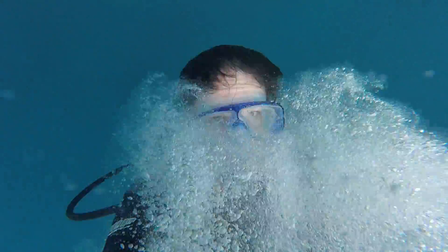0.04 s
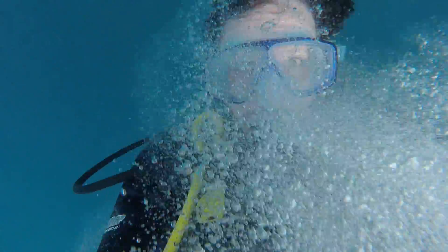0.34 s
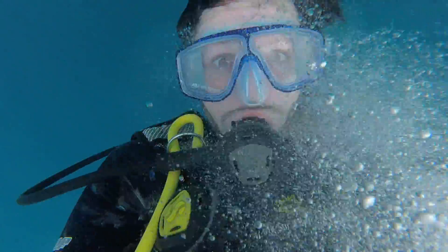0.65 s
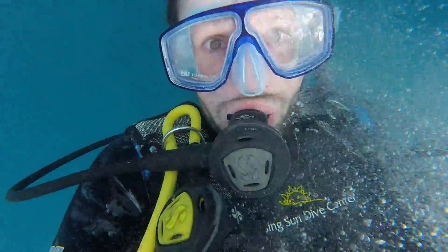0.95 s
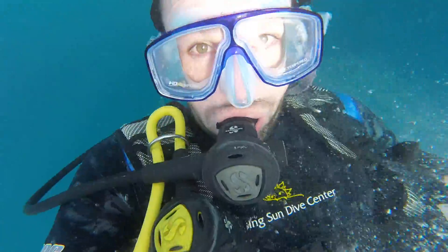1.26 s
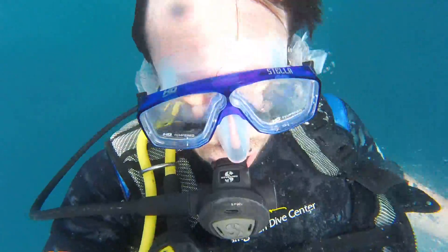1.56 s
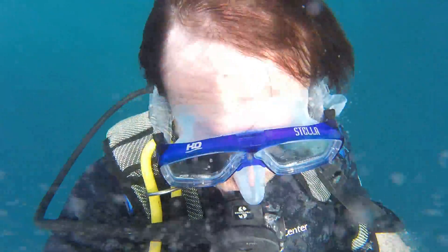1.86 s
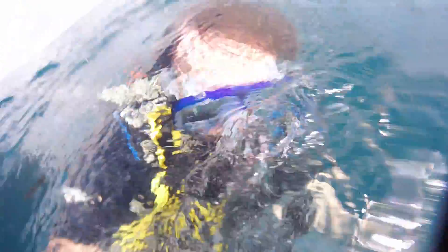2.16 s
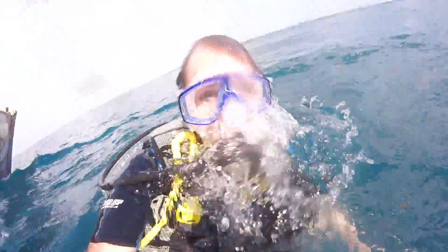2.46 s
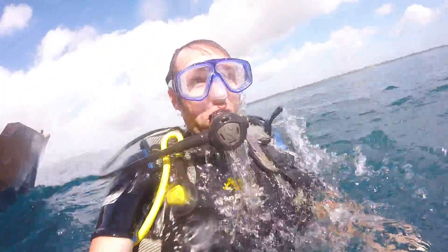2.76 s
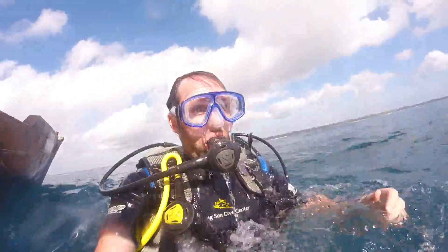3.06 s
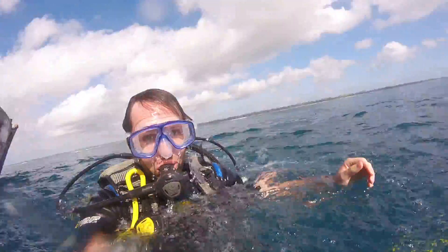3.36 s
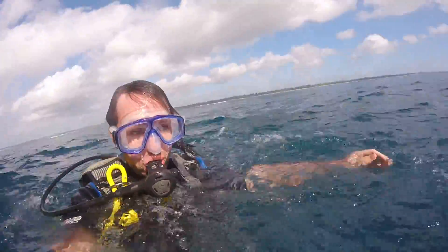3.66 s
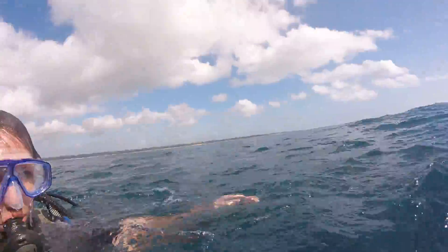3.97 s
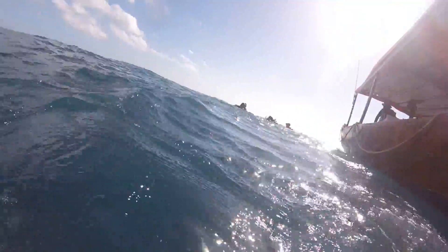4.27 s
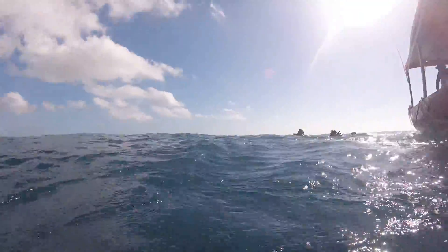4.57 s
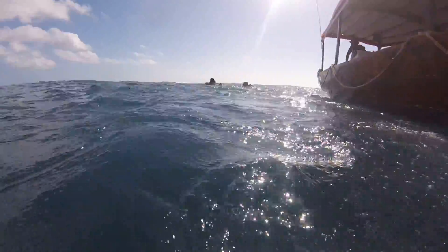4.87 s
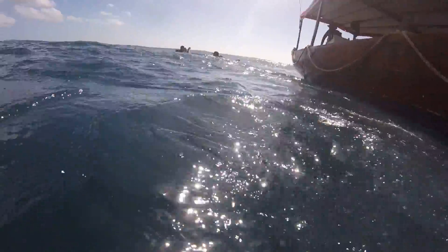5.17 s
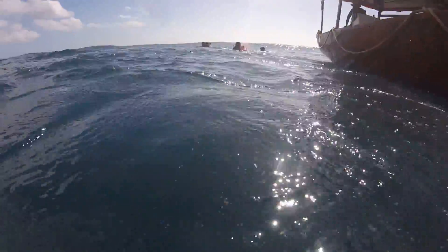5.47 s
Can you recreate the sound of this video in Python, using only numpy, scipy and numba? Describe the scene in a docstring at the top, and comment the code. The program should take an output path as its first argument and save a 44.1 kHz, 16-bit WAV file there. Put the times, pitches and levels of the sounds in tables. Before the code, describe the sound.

Muffled bubbles gurgle underwater around a diver, then foam fizzes at the surface and waves slosh and slap over the microphone.

```python
"""A diver rises through a cloud of bubbles, holding a camera in a waterproof case.
Under water big bubbles gurgle and tiny ones crackle and pop, over a deep sway of pressure.
Near 2 s the camera breaks the surface: the gurgle dies, drops tick on the case and foam fizzes.
From about 3.8 s waves wash over the case: gushes, slaps, plops, dull thumps and the hollow ring
of the air inside."""
import sys
import numpy as np
from scipy import signal
from scipy.fft import rfft, irfft, next_fast_len
from scipy.io import wavfile
from scipy.ndimage import uniform_filter1d
from numba import njit

SR = 44100
rng = np.random.default_rng(int(sys.argv[2]) if len(sys.argv) > 2 else 0)


def wav_out(sig):
    """Save sig, one row per channel (or a flat mono array), as 16-bit PCM at SR to the path in sys.argv[1]."""
    wavfile.write(sys.argv[1], SR, np.round(np.clip(np.atleast_2d(sig).T, -1, 1) * 32767).astype(np.int16))


N = 252296
TIME = np.arange(N) / SR
SURFACE_S = 1.953


def amp(db):
    """Decibels to gain."""
    return 10 ** (np.asarray(db) / 20)


def unit(x):
    """Scale to rms 1."""
    return x / np.sqrt(np.mean(x ** 2) + 1e-20)


def noise():
    """White noise."""
    return rng.standard_normal(N)


def swell(start_s, end_s, rise_db_per_s, fall_db_per_s):
    """Gain that rises until start_s, holds until end_s and falls away."""
    early_s, late_s = np.maximum(start_s - TIME, 0), np.maximum(TIME - end_s, 0)
    return amp(-rise_db_per_s * early_s - fall_db_per_s * late_s)


def hump(sound, crest_s, half_length_s, db):
    """Swell a sound smoothly to db at crest_s and let it ebb."""
    shape = np.cos(np.pi / 2 * np.clip((TIME - crest_s) / half_length_s, -1, 1)) ** 2
    part = shape * sound
    return amp(db) * part * np.sqrt(np.sum(shape ** 2) / (np.sum(part ** 2) + 1e-20))


def flutter(rate_hz, depth_db):
    """Randomly wandering gain."""
    steps = rng.standard_normal(1024)
    return amp(depth_db * np.interp(TIME * rate_hz, np.arange(len(steps)), steps))


def colour(x, points):
    """Shape a spectrum by (Hz, dB) points; rms 1."""
    hz, db = np.transpose(points)
    size = next_fast_len(N)
    log_hz = np.log(np.maximum(np.fft.rfftfreq(size, 1 / SR), 1))
    gain = amp(np.interp(log_hz, np.log(hz), db))
    return unit(irfft(rfft(x, size) * gain, size)[:N])


def resonate(x, hz, width_hz):
    """One resonance, gain 1 at its centre."""
    return signal.lfilter(*signal.iirpeak(hz, hz / width_hz, fs=SR), x)


def band(x, hz, width_hz):
    """A steep resonance; rms 1."""
    return unit(resonate(resonate(x, hz, width_hz), hz, width_hz))


@njit
def rings(start_s, hz, gain, t60_s, glide, rise_cycles):
    """Damped sines that build up, then die while the pitch climbs by the share `glide` per t60."""
    out = np.zeros(N)
    for k in range(len(start_s)):
        first, length = int(start_s[k] * SR), t60_s[k] * SR
        fade = np.exp(-np.log(1000) / length)
        build = np.exp(-hz[k] / (rise_cycles * SR))
        phase, strength, lag = 0., gain[k], 1.
        for i in range(max(0, min(int(length * 1.3), N - first))):
            out[first + i] += strength * (1 - lag) ** 2 * np.sin(phase)
            phase += 2 * np.pi * hz[k] / SR * (1 + glide * i / length)
            strength, lag = strength * fade, lag * build
    return out


def play(rows, glide, rise_cycles):
    """Ring each row of (start s, Hz, dB, t60 s)."""
    start_s, hz, db, t60_s = np.array(rows, float).T.copy()
    return rings(start_s, hz, amp(db), t60_s + 1e-4, float(glide), rise_cycles)


def with_ring_time(rows, t60_at_1khz_s, exponent):
    """Make rows of (start s, Hz, dB, t60 s): bigger, lower bubbles ring longer."""
    return [(s, hz, db, t60_at_1khz_s * (1000 / hz) ** exponent) for s, hz, db, *_ in rows]


def swarm(start_s, end_s, low_hz, high_hz, cycles, spread_db, glide, count):
    """Bubbles at random times and pitches, a few stronger than the rest."""
    when, pitch, strength, life = rng.random((count, 4)).T
    hz = low_hz * (high_hz / low_hz) ** pitch
    gain = hz / high_hz * amp(-spread_db * np.log(.01 + strength))
    t60_s = cycles * (.5 + life) / hz
    return rings(start_s + (end_s - start_s) * when, hz, gain, t60_s, glide, 0.96)


def whine(hz=9630, db=-76.5):
    """The camera's electronics give a faint high tone."""
    fade_up = np.minimum(0.34 + TIME / 2.2, 1)
    return amp(db) * np.sqrt(2) * np.sin(2 * np.pi * hz * TIME) * fade_up


# Distant sea through the case. Each row: frequency in Hz, gain in dB.
SEA_SPECTRUM = [(100, 6), (500, 1.5), (1300, -7.5), (2200, -13.5), (3000, -10), (5000, -18.5), (8000, -26),
                (12000, -28.5), (15000, -35.5)]

def sea():
    """The open sea hisses faintly as the camera nears the surface."""
    return amp(-58) * swell(1, 1, rise_db_per_s=25.5, fall_db_per_s=0) * colour(noise(), SEA_SPECTRUM)


# Strength of the pressure swings. Each row: time in seconds, relative level in dB.
SWAY_LEVELS = [(0.0, -22), (1.9, -25.5), (2.55, -29), (3.8, -33.5), (4.1, -25), (4.78, -26), (4.92, -29.5),
               (5.6, -24), (5.72, -34)]
# Their spectrum. Each row: frequency in Hz, gain in dB.
SWAY_SPECTRUM = [(5, -4.5), (11, 0), (22, -5.5), (35, -17), (60, -27.5), (100, -37), (200, -44), (400, -64),
                 (800, -100)]

def sway():
    """Water pressure heaves on the microphone as the camera moves."""
    heave = colour(noise(), SWAY_SPECTRUM)
    levelled = heave / np.sqrt(uniform_filter1d(heave ** 2, size=12000))
    return amp(6.5) * levelled * amp(np.interp(TIME, *np.transpose(SWAY_LEVELS)))


# Tiny bubbles under water. Each row: frequency in Hz, gain in dB.
CRACKLE_SPECTRUM = [(710, -23.5), (1200, -1), (1900, -7.5), (2590, -1), (3120, -8), (3770, -5.5),
                    (5300, -17), (7440, -19.5), (9670, -40.5), (16400, -120)]

def crackle():
    """Tiny bubbles burst against the case over a soft hiss; one puff of the finest fizzes past."""
    ticks = swarm(0, TIME[-1], 1000, 9000, cycles=22, spread_db=3.1, glide=.06, count=3000)
    ticks = colour(ticks * flutter(rate_hz=35, depth_db=4), CRACKLE_SPECTRUM)
    ticks *= swell(SURFACE_S, SURFACE_S, rise_db_per_s=8, fall_db_per_s=36)
    hiss = colour(noise(), CRACKLE_SPECTRUM)
    puff = hump(band(hiss, 4000, width_hz=3300), crest_s=0.904, half_length_s=0.088, db=-65.5)
    hiss *= swell(1, 1, rise_db_per_s=3, fall_db_per_s=12)
    return amp(-57) * ticks + amp(-65.5) * hiss + puff


# Foam through the case wall. Each row: frequency in Hz, gain in dB.
FOAM_SPECTRUM = [(180, -17.5), (300, -5.5), (390, -10), (487, -8.5), (822, -8.5), (1280, -5), (1590, -12),
                 (2160, -21), (2940, -5.5), (3600, -21.5), (5610, -24), (9670, -34.5), (16400, -120)]

def foam(flow):
    """Foam fizzes up after the surfacing, then drains; each wave stirs up a little more."""
    fizz = unit(swarm(0, TIME[-1], 303, 15250, cycles=45, spread_db=1.3, glide=0.29, count=13000))
    fizz *= flutter(rate_hz=30, depth_db=2.5)
    draining = swell(SURFACE_S + 0.69, SURFACE_S + 0.68, rise_db_per_s=16, fall_db_per_s=9.5)
    return colour(fizz + noise(), FOAM_SPECTRUM) * (amp(-49) * draining + amp(-13.5) * flow)


# Fine droplets on the case. Each row: start in seconds, level in dB.
DROPLETS = [(2.145, -36.5), (2.2175, -61), (2.2783, -38), (2.322, -54)]
# Their spectrum. Each row: frequency in Hz, gain in dB.
DROPLET_SPECTRUM = [(3000, -27), (7500, -2), (9600, -2), (11000, -16), (16000, -12)]

def droplets(decay_s=0.00046):
    """Fine droplets tick on the case: a few sharp ones just after the surfacing, faint ones around it."""
    envelope = sum(amp(db) * (TIME >= s) * np.exp(-np.abs(TIME - s) / decay_s) for s, db in DROPLETS)
    faint = swarm(.8, 2.8, 7000, 15000, cycles=12, spread_db=2, glide=.1, count=60)
    return envelope * colour(noise(), DROPLET_SPECTRUM) + amp(-83.5) * colour(faint, DROPLET_SPECTRUM)


# Waves over the case. Each row: start in seconds, hold in seconds, level in dB.
WAVES = [(3.785, 0.21, -49.5), (3.97, 0.083, -42), (4.152, 0.079, -47.5), (4.315, 0.095, -41),
         (4.468, 0.078, -38), (4.59, 0.26, -43), (5.124, 0.21, -61)]

def water_flow():
    """Strength of the water sheet on the case: each wave rises, holds and runs off."""
    waves = [amp(db) * swell(start_s, start_s + hold_s, rise_db_per_s=471, fall_db_per_s=296)
             for start_s, hold_s, db in WAVES]
    return np.max(waves, axis=0)


# Bubbly water on the case. Each row: frequency in Hz, gain in dB.
WASH_SPECTRUM = [(240, -53.5), (400, -44), (570, -12), (784, -7), (908, 1), (1100, -7), (1500, -2),
                 (1670, -9.5), (1870, -5.5), (2300, -12), (3120, -7), (3800, -26), (4140, -15), (4850, -61),
                 (16400, -120)]

def wash(flow):
    """A sheet of water runs over the case, dense with small bubbles over a slosh of larger ones."""
    start_s, end_s = WAVES[0][0] - .2, TIME[-1]
    bubbles = swarm(start_s, end_s, 400, 13000, cycles=20, spread_db=3.0, glide=.15, count=6000)
    sheet = colour(bubbles, WASH_SPECTRUM) * np.sqrt((end_s - start_s) / end_s)  # rms 1 while active
    slosh = band(noise(), 587, width_hz=910)
    return (sheet + amp(-12) * slosh) * flow * flutter(rate_hz=80, depth_db=3)


# Spurts of water. Each row: start in seconds, length in seconds, bubble level in dB,
# bubble pitch in Hz, spray level in dB.
GUSHES = [(4.291, 0.0515, -26.5, 2040, -45), (4.306, 0.014, -33.5, 1950, -50),
          (4.615, 0.024, -33, 1800, -46), (4.659, 0.025, -29.5, 1530, -56), (4.697, 0.0093, -32, 3460, -41),
          (4.755, 0.1, -30.5, 1660, -42), (4.962, 0.021, -45.5, 1160, -51),
          (5.005, 0.036, -46, 2860, -46.5), (5.171, 0.021, -39, 2950, -38.5),
          (5.579, 0.022, -50.5, 2930, -40.5)]
# Their spray. Each row: frequency in Hz, gain in dB.
SPRAY_SPECTRUM = [(300, 16.5), (1000, -18), (3000, 4.5), (5000, -6), (6000, -12.5), (7000, -11),
                  (8500, -22), (16000, -69.5)]

def gushes(ramp_s=0.004):
    """Water squeezes past the case in spurts: bubbles crowd around one pitch, spray hisses."""
    bubbles = swarm(0, TIME[-1], 559, 11900, cycles=13, spread_db=0.8, glide=0.12, count=22000)
    froth = colour(bubbles, WASH_SPECTRUM)
    spray = colour(noise(), SPRAY_SPECTRUM)
    out = np.zeros(N)
    for start_s, length_s, db, hz, spray_db in GUSHES:
        inside_s = np.minimum(TIME - start_s, start_s + length_s - TIME)
        gate = np.clip(inside_s / ramp_s + .5, 0, 1)
        spurt = gate * (resonate(froth, hz, width_hz=hz * 0.17) + amp(-9.5) * froth)
        spurt *= np.sqrt(length_s * SR / np.sum(spurt ** 2))
        out += amp(db) * spurt + amp(spray_db) * gate * spray
    return out


# The diver's bubbles. Each row: frequency in Hz, gain in dB.
CLOUD_SPECTRUM = [(35, -21), (60, -13), (103, -4), (172, -1.5), (296, -2), (354, -2.5), (556, -2),
                  (624, -1.5), (760, -15.5), (930, -25.5), (1160, -43), (1800, -59), (2860, -72)]

def bubble_cloud(split_hz=280, growth_db_per_s=0.62):
    """The diver's bubbles gurgle; the big ones rise away first, the rest die out at the surface."""
    bubbles = swarm(0, TIME[-1], 60.66, 1217.3, cycles=45.5, spread_db=2.0, glide=0.18, count=7000)
    gurgle = colour(bubbles, CLOUD_SPECTRUM)
    lows = signal.sosfiltfilt(signal.butter(4, split_hz, fs=SR, output="sos"), gurgle)
    medium = amp(-35.5) * unit(gurgle - lows) * swell(0, 1.54, 0, fall_db_per_s=21)
    big = amp(-34) * unit(lows) * swell(0, 1.464, 0, fall_db_per_s=46.5)
    submerged = swell(0, 2.034, 0, fall_db_per_s=116)
    return (medium + big) * amp(growth_db_per_s * TIME) * submerged


# Knots of bubbles. Each row: crest in seconds, half length in seconds, pitch in Hz, level in dB.
SURGES = [(0.005, 0.071, 311, -24.5), (0.11, 0.02, 256, -20), (0.162, 0.066, 466, -27.5),
          (0.338, 0.059, 463, -24), (0.331, 0.052, 316, -22), (0.414, 0.041, 226, -27),
          (0.61, 0.075, 186, -27.5), (0.639, 0.021, 427, -30.5), (0.921, 0.043, 180, -24),
          (0.991, 0.04, 161, -24), (1.52, 0.17, 265, -31.5), (1.778, 0.051, 463, -33)]

def surges():
    """Knots of big bubbles swell out of the cloud, each crowding around one pitch."""
    bubbles = swarm(0, 2, 90, 900, cycles=14, spread_db=.5, glide=.2, count=2500)
    gurgle = colour(bubbles, CLOUD_SPECTRUM)
    return sum(hump(band(gurgle, hz, width_hz=hz * 0.35), crest_s, half_length_s, db)
               for crest_s, half_length_s, hz, db in SURGES)


# Large single bubbles. Each row: start in seconds, pitch in Hz, level in dB.
GLUGS = [(.097, 247, -25), (.171, 524, -24.5), (.225, 604, -25), (.575, 95, -22.5), (.765, 644, -27),
         (.94, 107, -20.5), (1.164, 598, -27), (1.431, 729, -29), (1.727, 450, -21.5)]

def glugs():
    """Large bubbles ring under water, climbing in pitch."""
    return play(with_ring_time(GLUGS, t60_at_1khz_s=0.07, exponent=0.75), glide=0.23, rise_cycles=0.25)


# Gulps of air. Each row: crest in seconds, half length in seconds, pitch in Hz, level in dB.
GULPS = [(3.751, 0.019, 219.4, -36), (3.86, 0.0075, 213, -31.5), (4.014, 0.027, 213.4, -31.5),
         (4.084, 0.089, 233, -31), (4.177, 0.024, 227, -30), (4.213, 0.019, 255, -32),
         (4.233, 0.046, 217, -28.5), (4.323, 0.061, 214, -28.5), (4.39, 0.025, 218, -35),
         (4.433, 0.035, 241, -41), (4.48, 0.056, 221, -35), (4.709, 0.014, 222, -24),
         (4.785, 0.056, 220, -32)]

def case_air(flow, hollow_hz=223, width_hz=31):
    """The air in the case gulps at each shove of water and rings hollow under the wash."""
    shaking = noise()
    gulps = sum(hump(band(shaking, hz, width_hz), crest_s, half_length_s, db)
                for crest_s, half_length_s, hz, db in GULPS)
    hollow = amp(3.5) * band(noise(), hollow_hz, width_hz) * flow
    return gulps + hollow


# Bumps on the case. Each row: start in seconds, pitch in Hz, relative level in dB, t60 in seconds.
THUMPS = [(3.315, 94.5, -45, 0.18), (4.035, 83, -14, 0.014), (4.154, 42.5, -12, 0.056),
          (4.433, 226, -31, 0.065), (4.703, 38.6, -8, 0.1), (4.727, 220, -29, 0.079),
          (4.855, 114.5, -9, 0.033), (4.862, 201.3, -33, 0.097), (5.175, 218, -37.5, 0.055),
          (5.216, 167, -27, 0.028), (5.585, 32.3, -13, 0.13), (5.588, 110, -8.5, 0.016)]

def thumps(air_hz=218):
    """Waves bump the case and set the air inside ringing."""
    bumps = play(THUMPS, glide=0.085, rise_cycles=0.12)
    return amp(10) * bumps + amp(17) * resonate(bumps, air_hz, width_hz=34)


# Slaps of water. Each row: start in seconds, relative level in dB, contact pitch in Hz (hard is high).
SLAPS = [(3.9989, -23, 2700), (4.1615, -28, 1750), (4.291, -22.5, 2200), (4.312, -23, 2100),
         (4.3288, -15, 2010), (4.3346, -21, 990), (4.3468, -19, 1300), (4.3716, -6.5, 2290),
         (4.381, -23, 2950), (4.431, -8, 1050), (4.452, -26, 2790), (4.708, -21, 2700), (4.73, -28, 3600),
         (4.7625, -14.5, 2820), (4.8712, -32.5, 2700), (4.9136, -30, 1900), (5.2431, -27.5, 2330)]
# Modes of the case wall. Each row: frequency in Hz, gain in dB, t60 in seconds.
WALL_MODES = [(926, 0.5, 0.019), (1350, 2, 0.018), (1910, -9, 0.021), (3070, 2, 0.0088), (4090, -10, 0.02)]

def slaps(fall_db_per_octave=8.5, detune=.025):
    """Slaps ring the wall's modes, most near the contact pitch; the water's load detunes each mode."""
    rows = []
    for start_s, db, contact_hz in SLAPS:
        loads = rng.standard_normal(len(WALL_MODES))
        for (hz, mode_db, t60_s), load in zip(WALL_MODES, loads):
            loss_db = fall_db_per_octave * abs(np.log2(hz / contact_hz))
            rows.append((start_s, hz * (1 + detune * load), db + mode_db - loss_db, t60_s))
    return amp(1.5) * play(rows, glide=0, rise_cycles=.65)


# Pops against the case. Each row: start in seconds, pitch in Hz, relative level in dB,
# click offset in dB.
POPS = [(0.457, 4450, -49, -19), (.9636, 5130, -45.5, -21), (1.1407, 2620, -39, -7),
        (1.3443, 1590, -43.5, 5.5), (1.5653, 2450, -41.5, -26), (1.6314, 1020, -28.5, -17),
        (1.6328, 2770, -33.5, 0), (1.8165, 1630, -38.5, 4), (1.837, 696, -15, -12.5),
        (1.836, 4100, -37, -18), (1.8776, 4240, -45, -20), (1.9635, 2780, -33, -21),
        (1.974, 4520, -44, -22), (2.02, 2230, -36.5, -19), (2.1506, 1020, -26.5, -1),
        (2.1649, 3460, -23, -15), (2.2174, 5480, -12.5, -15), (2.2429, 4480, -18, -17),
        (2.274, 1840, -40.5, 8.5), (2.29, 1200, -29.5, -7), (2.3239, 6590, -22, -8),
        (2.426, 990, -36.5, -19), (3.147, 950, -34.5, -20), (3.437, 1910, -39, 1.5), (3.762, 864, -14, -24),
        (3.777, 880, -24, -16), (3.7864, 1820, -25.5, -10), (3.821, 1270, -32, -25),
        (3.986, 1440, -24.5, -17), (4.308, 1700, -10, -15), (4.405, 1490, -23.5, -18),
        (4.473, 915, -20.5, -2), (4.488, 2300, -25.5, -25), (4.521, 1860, -24, -22),
        (4.553, 940, -23.5, -20), (4.596, 1340, -24.5, -26), (4.665, 1510, -19.5, 0),
        (4.675, 1500, -28, -20), (4.745, 1350, -21, -14), (4.789, 925, -21, -10), (4.816, 1490, -20, -16),
        (5.5901, 990, -29.5, 4)]
# Their click on the wall. Each row: frequency in Hz, gain in dB.
CLICK_SPECTRUM = [(300, -27), (900, -31.5), (1400, 12.5), (2200, 4), (2900, 18), (3600, 0), (4300, 13.5),
                  (5500, -10.5), (8000, -9.5), (15000, -29)]

def pops(click_decay_s=0.0018, shed_below_hz=3000):
    """Bubble pops under water, then plops and drops at the surface: each clicks and rings briefly."""
    rows = with_ring_time(POPS, t60_at_1khz_s=0.016, exponent=.56)
    rattle = colour(noise(), CLICK_SPECTRUM)
    clicks, shed = np.zeros(N), []
    for (start_s, hz, db, t60_s), (*_, click_db) in zip(rows, POPS):
        span = slice(int(start_s * SR), int(start_s * SR) + 512)
        click = rattle[span] * np.exp(-(TIME[span] - start_s) / click_decay_s)
        softness = signal.butter(3, min(2 * hz, .4 * SR), fs=SR)  # big bubbles click softly
        clicks[span] += amp(db + click_db) * signal.lfilter(*softness, click)
        for delay, pitch, weakness in rng.random((4, 3)):
            if hz < shed_below_hz:  # bigger bubbles shed four others
                shed_s = start_s + 0.2437 * t60_s * delay
                shed_hz = hz * 2 ** (1.3 * pitch - .7)
                shed.append((shed_s, shed_hz, db - 18.5 - 12 * weakness, 3 * t60_s))
    bubbles = play(rows, glide=.08, rise_cycles=.4) + play(shed, glide=.15, rise_cycles=.7)
    return amp(4.5) * bubbles + clicks


def scene():
    """All sources at one microphone."""
    flow = water_flow()
    underwater = bubble_cloud() + glugs() + surges() + crackle()
    surface = foam(flow) + sea() + wash(flow) + gushes()
    on_case = pops() + slaps() + droplets() + thumps() + case_air(flow)
    fade_in = np.sin(np.pi / 2 * np.minimum(TIME / .004, 1)) ** 2
    return (fade_in * (underwater + surface + on_case + sway() + whine()))[None]


def record(dry):
    """The camera cuts the treble above 15.7 kHz."""
    return signal.sosfilt(signal.ellip(8, .2, 70, 15700, fs=SR, output="sos"), dry)


dry = scene()
out = record(dry)
wav_out(out)
```